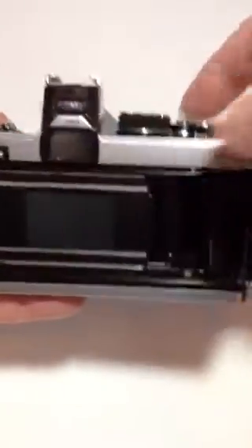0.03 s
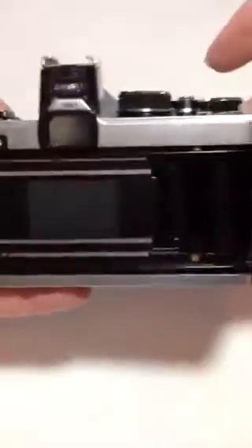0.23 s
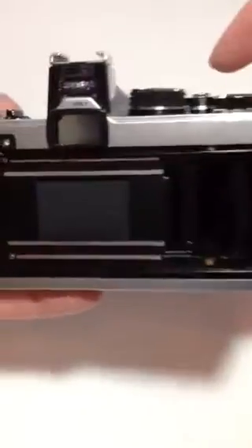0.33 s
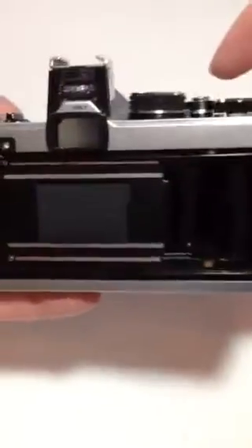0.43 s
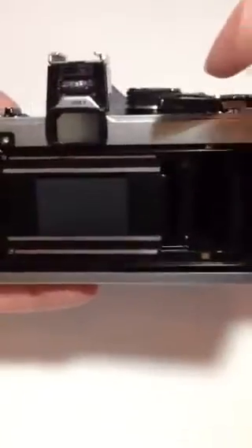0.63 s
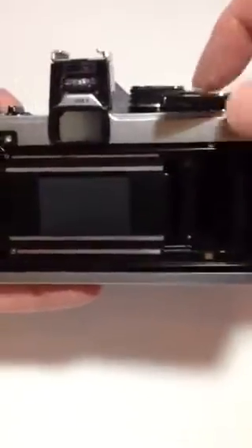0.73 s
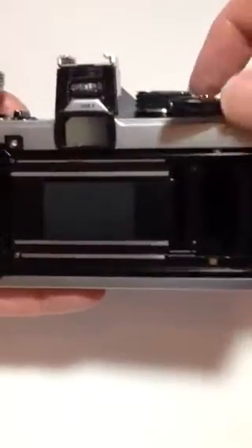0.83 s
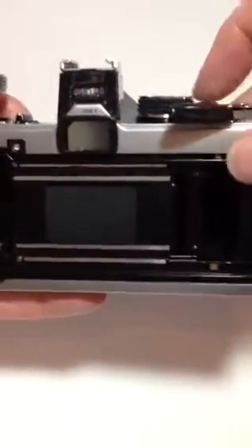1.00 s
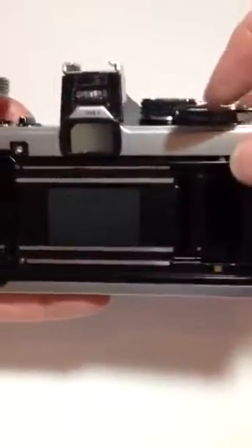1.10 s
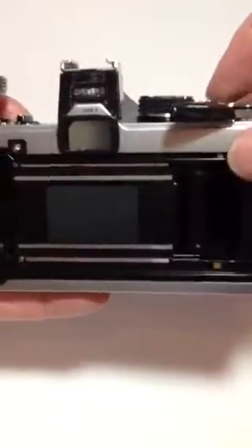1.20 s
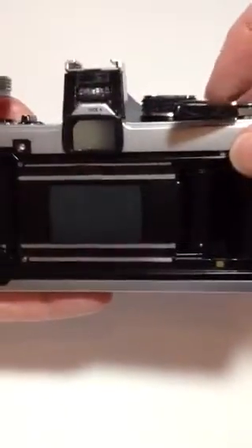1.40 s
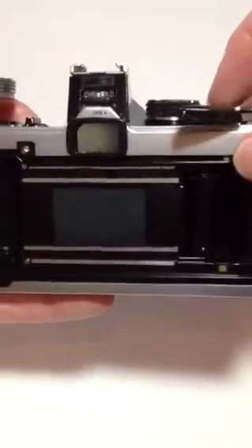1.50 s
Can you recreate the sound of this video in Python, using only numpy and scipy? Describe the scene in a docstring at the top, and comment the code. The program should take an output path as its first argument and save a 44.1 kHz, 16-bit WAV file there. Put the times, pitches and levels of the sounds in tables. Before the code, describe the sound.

A film camera is wound close to the microphone in a small, quiet room. For the first 0.45 seconds its gears whirr and rasp under sharp, springy clicks, thickest around 0.4 seconds. At about 0.6 seconds the lever snaps back with a short metallic ring, the loudest sound. A soft finger rub and faint ticks follow near 1 second, with tiny ticks at 1.5 seconds over faint room hum.

```python
"""A film camera is wound close to the microphone in a small, quiet room.
First its gears whirr and rasp, while small catches (pawls) click and set springs ringing.
Then the spring-loaded lever snaps home against its stop and rings the top plate: the loudest sound.
Last, a finger settles on the camera with a soft rub and a few faint ticks."""
import sys
import numpy as np
from scipy import signal
from scipy.fft import rfft, irfft, next_fast_len
from scipy.io import wavfile
from scipy.ndimage import uniform_filter1d

SR = 44100
rng = np.random.default_rng(int(sys.argv[2]) if len(sys.argv) > 2 else 0)


def log_audio(samples):
    """Write samples as a 16-bit WAV file to the path given in sys.argv[1]."""
    # one column per channel
    frames = np.atleast_2d(samples).T
    # limit to full scale, then quantise
    limited = np.clip(frames, -1, 1)
    pcm = np.round(limited * 32767).astype(np.int16)
    wavfile.write(sys.argv[1], SR, pcm)


N = 68355
SIZE = 8192  # samples in one click
HZ = np.fft.rfftfreq(SIZE, 1 / SR)
AGE, TIME = np.arange(SIZE) / SR, np.arange(N) / SR  # seconds into a click, and into the scene


def amp(db):
    """Turn decibels into a gain."""
    return 10 ** (np.asarray(db) / 20)


def unit(x):
    """Scale to an average (rms) level of 1."""
    return x / np.sqrt(np.mean(x ** 2) + 1e-20)


def along(points, hz):
    """Read a curve of (f/Hz, value) points on a log frequency axis."""
    f, v = np.transpose(points)
    return np.interp(np.log(hz + 1), np.log(f + 1), v)


def fade(t, t60):
    """Die away by 60 dB every t60 seconds."""
    return np.exp(-np.log(1000) * t / t60)


def sine(hz, t):
    """A pure tone that starts at a random point of its cycle."""
    return np.sin(2 * np.pi * (hz * t + rng.random()))


def add(track, s, sound):
    """Mix a sound in at s seconds."""
    part = track[max(round(s * SR), 0):][:len(sound)]
    part += sound[:len(part)]


def filtered(x, gain):
    """Apply a gain that depends on frequency."""
    size = next_fast_len(N + SIZE)
    return irfft(rfft(x, size) * gain(np.fft.rfftfreq(size, 1 / SR)), size)[:N]


def noise(points, envelope=1):
    """Noise of level 1 with the given spectrum."""
    return unit(filtered(envelope * rng.standard_normal(N), lambda hz: amp(along(points, hz))))


def hump(offset, width):
    """A flat-topped hill: 1 in the middle, half at one width away."""
    return 1 / (1 + (offset / width) ** 4)


def band(hz, centre, octaves):
    """Let through the frequencies near the centre."""
    return hump(np.log2((hz + 1) / centre), octaves)


def impact(envelope, gain):
    """A burst of tiny contacts rings a part whose spectrum is gain."""
    burst = rfft(envelope * rng.standard_normal(SIZE))
    power = np.abs(uniform_filter1d(np.abs(burst) ** 2, size=70)) + 1e-12
    cepstrum = irfft(np.log(np.maximum(gain, 1e-6) / np.sqrt(power)))
    # minimum phase: the part rings after the hit, never before
    cepstrum[1:SIZE // 2] *= 2
    cepstrum[SIZE // 2 + 1:] = 0
    sound = irfft(burst * np.exp(rfft(cepstrum)))
    return sound / np.linalg.norm(sound) * np.sqrt(.002 * SR)  # the energy of 2 ms at level 1


def background():
    """Room air, microphone hiss and a faint appliance hum."""
    # tones of the hum: f/Hz, level/dB
    hum_tones = [(119.6, -78), (196, -78.5), (442, -81), (596, -85.5)]
    # spectrum of air and hiss: f/Hz, level/dB
    air = [(25, -21), (50, -20), (90, -15.5), (115, -12.5), (150, -1), (200, -4), (270, -2), (350, -5),
           (440, -6), (520, -8.5), (650, -9), (950, -14.5), (2200, -16), (3600, -18), (8000, -19.5),
           (15000, -24)]
    hum = sum(amp(db) * np.sqrt(2) * sine(hz, TIME) for hz, db in hum_tones)
    return amp(-67.5) * noise(air) + hum


def room(x):
    """The walls send back a few echoes and a short, blurred tail."""
    # how long the tail lasts: f/Hz, t60/s
    decay = [(200, .25), (800, 0.33), (2100, .33), (5600, 0.27), (14700, .22)]
    # spectrum of the tail: f/Hz, level/dB
    colour = [(100, -8.5), (1100, -3.5), (1700, 1.5), (4500, -2.5), (8000, -1.5), (11000, -2.5),
              (15000, -0.5)]
    # wall echoes: delay/s, level/dB
    walls = [(.0150, -29), (.0169, -25), (.0322, -31.5)]
    hz, t, spectra = signal.stft(rng.standard_normal(SR // 2), SR, nperseg=256)
    spectra = spectra * fade(t, along(decay, hz)[:, None]) * amp(along(colour, hz))[:, None]
    tail = signal.istft(spectra, SR, nperseg=256)[1]
    tail *= 1 - np.exp(-np.arange(len(tail)) / SR / .0031)  # builds up in about 3 ms
    tail = amp(-20.5) * tail / np.linalg.norm(tail)
    for delay, db in walls:
        add(tail, delay, amp([db]))
    return signal.fftconvolve(x, tail)[:N]


def plate():
    """The top plate's spectrum: it rings most strongly at a few frequencies."""
    # ringing peaks: f/Hz, width/Hz, level/dB
    peaks = [(880, 180, -11), (2000, 230, 1), (2380, 600, 1.5), (3470, 560, 3.5), (4290, 590, 3.5),
             (5025, 110, 0), (5790, 280, -0.5), (6660, 360, 3), (7640, 650, -0.5), (9100, 500, -7),
             (9970, 540, -3.5), (11700, 370, -2), (12600, 500, -7.5), (14500, 700, -12.5)]
    # broad spectrum under them: f/Hz, level/dB
    base = [(50, -47), (200, -17), (600, -19), (1400, -28.5), (3000, -13.5), (15000, -7)]
    peak_power = sum(amp(db) ** 2 * hump(HZ - hz, width / 2) for hz, width, db in peaks)
    return np.sqrt(amp(along(base, HZ)) ** 2 + peak_power)


def handling():
    """Fingers tap the top plate, nudge the case and slide on the lever."""
    # light taps: t/s, level/dB, t60/s, f/Hz
    touches = [(.5495, -59, .012, 7000), (0.5574, -58, .015, 4570), (0.6, -59, 0.037, 2650),
               (0.612, -50, .03, 4500), (0.9799, -52, .014, 2700), (1.0575, -58, 0.028, 2700),
               (1.502, -63, .02, 9000), (1.518, -64, .02, 3170)]
    # brief rings of the nudged case: t/s, level/dB, swell and fade time/s, f/Hz
    bumps = [(0.031, -63, 0.022, 270), (0.069, -52, 0.0057, 1373), (0.064, -57, 0.0072, 680),
             (0.335, -49.5, 0.0044, 700), (0.382, -43.5, 0.003, 741), (0.395, -45.5, 0.0039, 719.3),
             (1.058, -58, 0.016, 263.7), (1.0584, -65.5, 0.0073, 2569)]
    out = np.zeros(N)
    for s, db, t60, hz in touches:
        soft_touch = (1 - fade(AGE, .004)) * fade(AGE, t60)
        add(out, s, amp(db) * impact(soft_touch, plate() * band(HZ, hz, octaves=.59)))
    for s, db, spread, hz in bumps:
        out += amp(db) * np.sqrt(2) * np.exp(-np.abs(TIME - s) / spread) * sine(hz, TIME)
    rub = unit(filtered(rng.standard_normal(N), lambda hz: band(hz, centre=950, octaves=.45)))
    swell = np.exp(-((TIME - 1.021) / .058) ** 2)
    return out + amp(-69.5) * swell * rub


def gears():
    """Teeth meet unevenly: a wavering whirr, a hollow rumble from the case and a fine metal rasp."""
    # course of the winding: t/s, whirr level/dB, whirr f/Hz, rasp level/dB
    winding = [(0, -77, 745.4, -78.5), (.045, -73, 753.6, -63.5), (0.064, -57.5, 732.6, -55.5),
               (0.092, -69.5, 639.3, -55), (.128, -57.5, 649.6, -54), (0.16, -68.5, 723.4, -59),
               (0.199, -57.5, 742.3, -52), (.218, -65.5, 695.3, -60.5), (.24, -55.5, 648, -54),
               (.27, -68.5, 619, -58), (.295, -57.5, 573.6, -59), (.32, -59, 630.2, -52.5),
               (.338, -56, 709.7, -48.5), (.35, -65, 727.5, -52), (.385, -53.5, 760, -45),
               (.408, -53.5, 693, -43.5), (.42, -73, 686, -61), (.45, -84, 707, -58.5),
               (0.481, -92, 730, -80)]
    # spectrum of the hollow case: f/Hz, level/dB
    hollow_case = [(80, -31.5), (200, -14.5), (350, -2), (600, -3), (850, 3.5), (1100, -7), (1400, -5.5),
                   (2000, -19.5), (5000, -40)]
    # spectrum of the rasp: f/Hz, level/dB
    rasp = [(300, -25.5), (1500, -3.5), (2400, -1.5), (3200, 3), (4100, 0), (7000, -5), (9500, -4),
            (15000, -10)]
    teeth_per_s, scatter_db, sliding, waver_hz = 250, 5, .4, 95
    times, *columns = np.transpose(winding)
    whirr_db, pitch, rasp_db = [np.interp(TIME, times, column) for column in columns]
    teeth = np.zeros(N)
    for k, (slip, strength) in enumerate(rng.standard_normal(size=(330, 2))):
        add(teeth, (k + .18 * slip) / teeth_per_s, amp(scatter_db * strength) * fade(AGE, t60=.02))
    contact = teeth + sliding
    phase = 2 * np.pi * np.cumsum(pitch) / SR
    waver = lambda: filtered(rng.standard_normal(N), lambda hz: 1 / (1 + (hz / waver_hz) ** 2))
    grip = uniform_filter1d(contact, size=90) + sliding
    whirr = unit(grip * (waver() * np.cos(phase) + waver() * np.sin(phase)))
    rumble = amp(-1) * noise(hollow_case, contact)
    return amp(whirr_db) * (whirr + rumble) + amp(rasp_db) * noise(rasp, contact)


def pawls(ring_share):
    """Each catch clicks with its own ring, thuds through the case and stirs the springs."""
    # clicks: t/s, level/dB, rise/s, t60/s, thud/dB, case knock/dB, treble/dB, ring f/Hz, full ring/dB
    clicks = [(0.0548, -42, 0.0014, 0.013, -8, -6, 9, 9400, 12),
              (0.0747, -32, .0005, 0.0078, -15, 8, -2, 10900, 13),
              (0.0773, -33, 0.00022, 0.018, 2, 7.5, -1.5, 12550, 13.5),
              (0.1944, -43, .0005, 0.023, 6, -1.5, -37, 2900, 15),
              (.2270, -31, 0.0012, 0.0098, 4, -4, -2.5, 8300, 5.5),
              (0.2324, -33.5, 0.0018, 0.01, -15, -1, -2.5, 14900, 15),
              (0.2469, -26, 0.000485, 0.0089, -8, -10, 1, 11700, 6.5),
              (0.3541, -45, .0005, 0.015, -7, -2.5, 4, 5800, 20),
              (.3580, -19.5, .0004, .014, 5, 1.5, 0.5, 2200, 7.5),
              (0.3644, -29, .0015, 0.013, -2, -1.5, 2.5, 9900, 11),
              (0.3788, -24.5, .0008, 0.017, -4.5, -2, -0.5, 9500, 7),
              (0.3923, -22, .0008, 0.013, 6.5, 6.5, 2.5, 6400, 8.5),
              (0.399, -28, 0.00049, .026, 0, -2.5, 6, 6100, 10),
              (0.4127, -38, 0.00099, .020, 0, -5.5, 7.5, 6200, 9.5),
              (0.4227, -23.5, 0.00056, .010, -9.5, -16, -1.5, 9650, 11.5),
              (.4450, -42, 0.001, 0.011, -13, -8, 1.5, 9500, 4.5)]
    # spectrum that all clicks start from: f/Hz, level/dB
    base = [(60, -30), (200, -7.5), (700, -9), (1500, -14), (2300, -6.5), (3200, 4), (4100, -2.5),
            (6500, -0.5), (8500, 1), (12000, -2.5), (15000, 0)]
    # tones of the springs: f/Hz, relative level/dB, t60/s
    spring_tones = [(3618, -6.5, .25), (5560, -1, .3), (6600, -1, 0.43), (5800, 0, .3), (8570, -3, .25),
                    (9800, 1, 0.24), (10000, -2, .3), (9680, -4, .25), (9908, -5.5, .25)]
    out = np.zeros(N)
    for s, db, rise, t60, thud_db, knock_db, treble_db, ring_hz, ring_db in clicks:
        colour = along(base, HZ) + thud_db * hump(HZ, width=382)
        colour += knock_db * band(HZ, centre=920, octaves=.9)
        colour += treble_db * (1 - hump(HZ, width=8000))
        colour += ring_share * ring_db * hump(HZ - ring_hz, width=450)
        click = impact(np.minimum(AGE / rise, 1) * fade(AGE, t60), amp(colour))
        springs = sum(amp(level + rng.normal(0, 2)) * fade(AGE, life) * sine(hz, AGE)
                      for hz, level, life in spring_tones)
        add(out, s, amp(db) * (click + amp(-48.5) * springs))
    return out


def lever_snap(response, db):
    """The lever hits its stop: one hard blow and a short chatter ring the top plate."""
    snap_s, hold_s = .6139, .0011
    blow = fade(np.maximum(AGE - hold_s, 0), t60=.0045)
    chatter = amp(-7) * fade(AGE, t60=.021)
    out = np.zeros(N)
    add(out, snap_s, amp(db) * impact(blow + chatter, response))
    return out


def scene():
    """The microphone hears the parts ring sharply; the room gets the smoother sum of all directions."""
    # what the plate sends into the room: f/Hz, level/dB
    plate_to_room = [(100, -26.5), (1200, -13), (2000, -3.5), (4200, -1.5), (7000, -2), (10000, -8.5),
                     (15000, -9)]
    quiet_parts = gears() + handling()
    direct = pawls(ring_share=.98) + lever_snap(plate(), db=-13) + quiet_parts
    all_round = pawls(ring_share=.3) + lever_snap(amp(along(plate_to_room, HZ)), db=-9.5) + quiet_parts
    return (direct + room(all_round) + background())[None]


def record(dry):
    """The recorder thins the deep bass, rounds the highest peak and cuts the very top treble."""
    bass_hz, ceiling, top_hz = 70, .6, 15220
    thin = signal.sosfilt(signal.butter(1, bass_hz, "highpass", fs=SR, output="sos"), dry[0])
    rounded = thin / (1 + (thin / ceiling) ** 6) ** (1 / 6)
    return filtered(rounded, lambda hz: 1 / np.sqrt(1 + (hz / top_hz) ** 240))[None]


dry = scene()
out = record(dry)
log_audio(out)
```